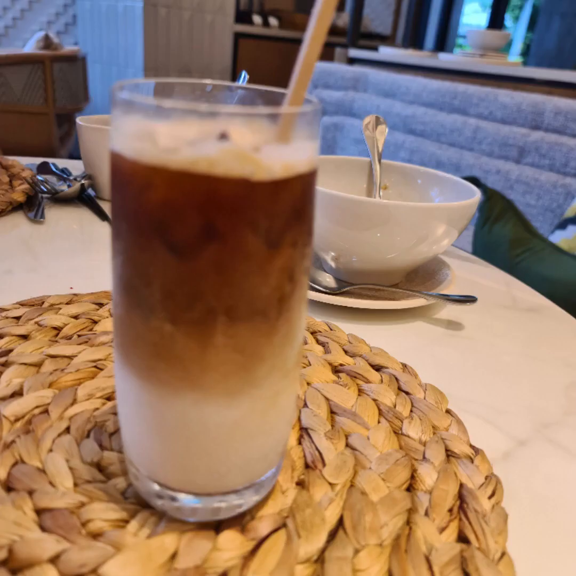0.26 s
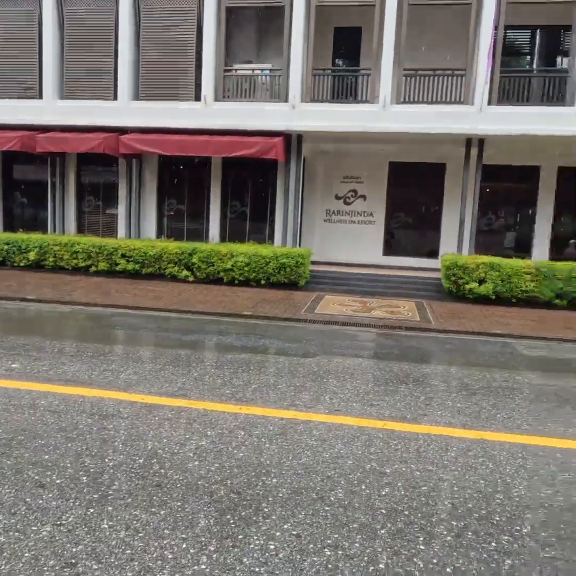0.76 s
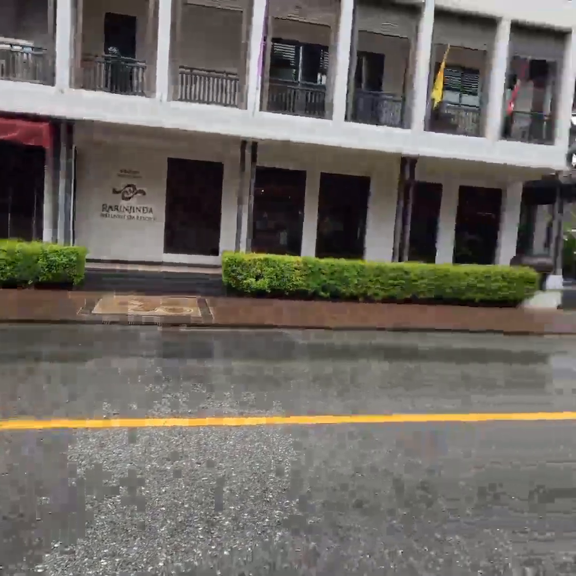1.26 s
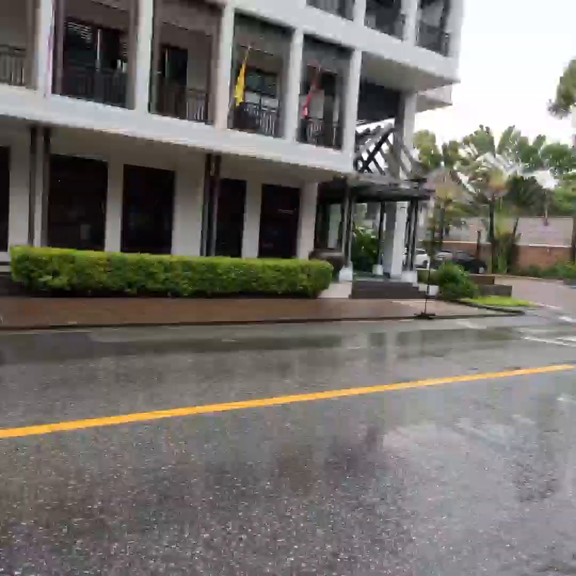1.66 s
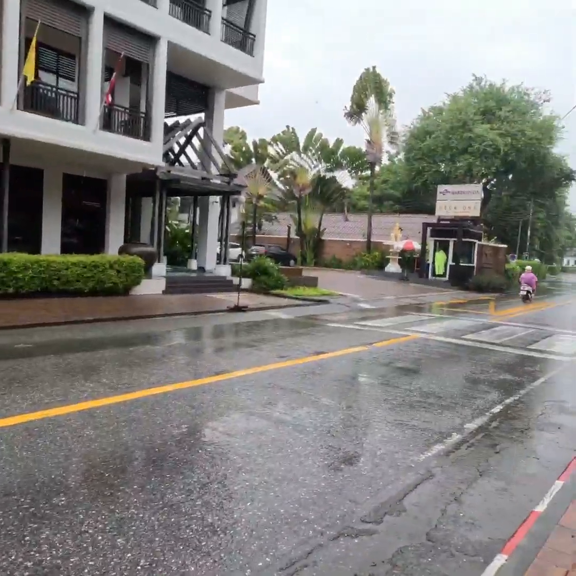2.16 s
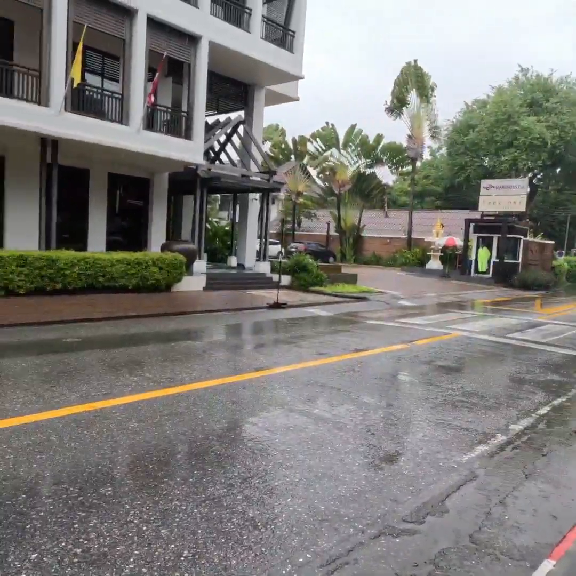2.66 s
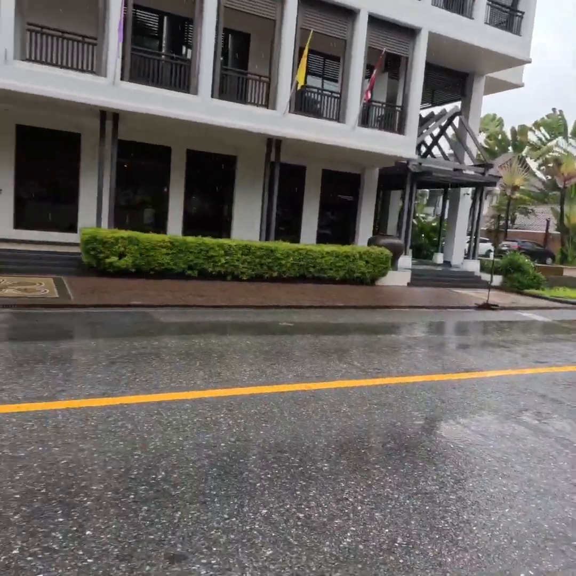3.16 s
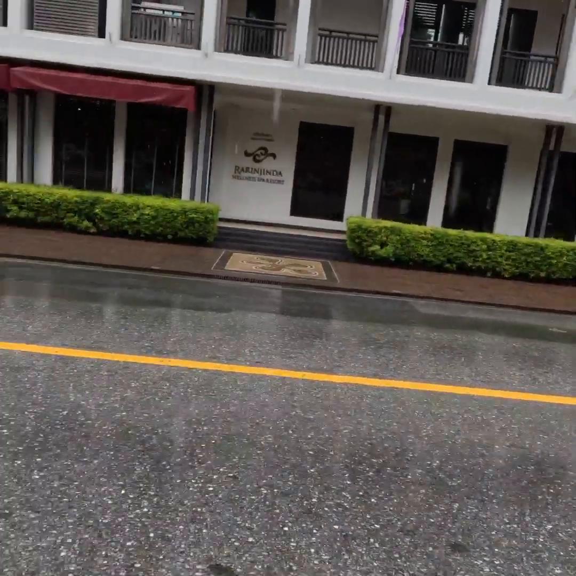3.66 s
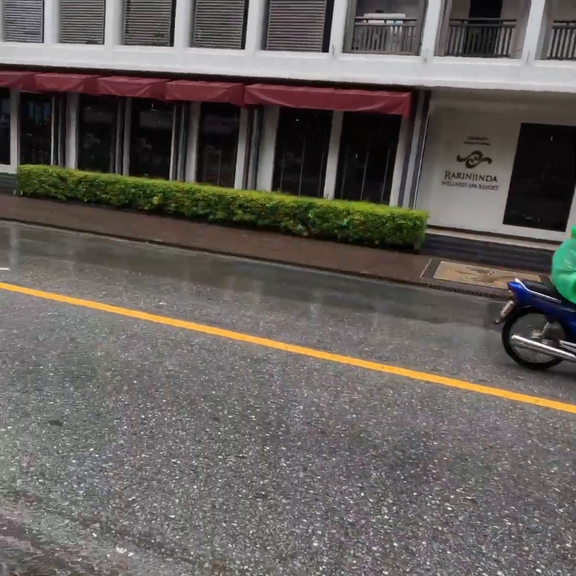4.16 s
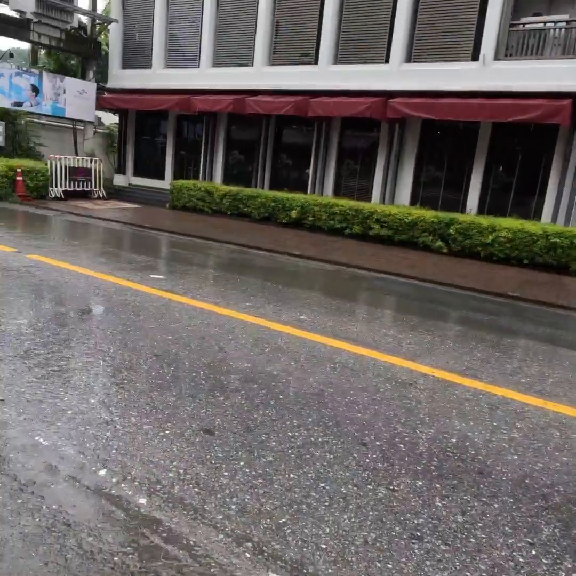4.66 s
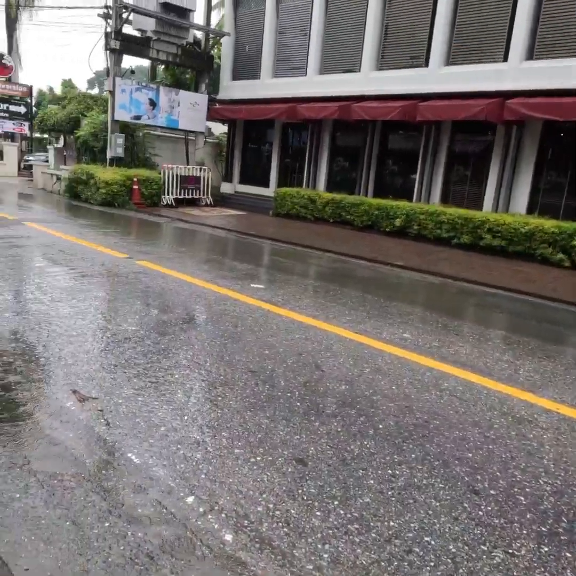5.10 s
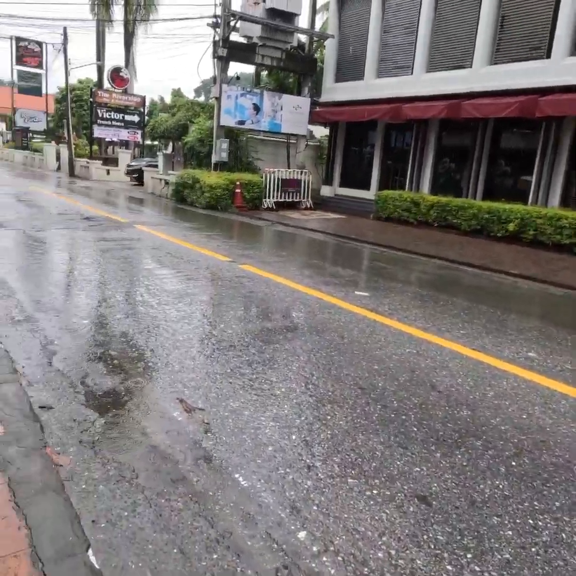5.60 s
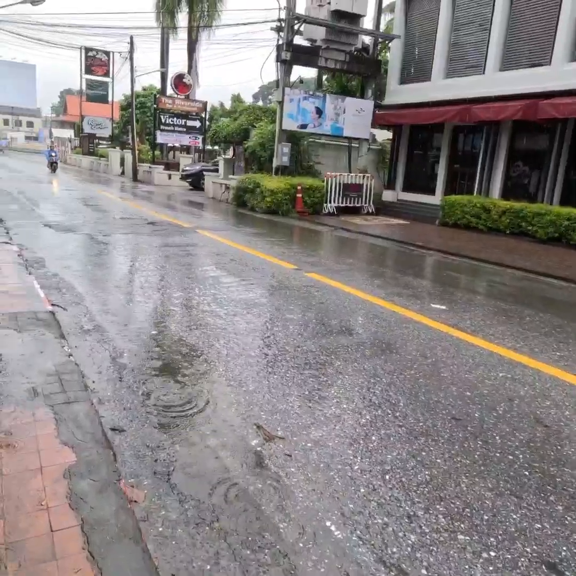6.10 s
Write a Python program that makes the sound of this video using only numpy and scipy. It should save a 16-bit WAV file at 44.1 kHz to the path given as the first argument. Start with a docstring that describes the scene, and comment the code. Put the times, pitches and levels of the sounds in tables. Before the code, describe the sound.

Heard from the kerb of a street in light rain, wet tyres hiss over a low traffic rumble, with single drops plinking into puddles and ticking on the pavement close by. The sound fades in on a motorbike moving away. A second, slower motorbike then putters past close to the microphone, its gears whining briefly and dipping in pitch. Near the end another engine hums in the distance.

```python
"""A motorbike rides away on a wet street in light rain, heard from the kerb, fading in after a silence.
A slower bike passes close with gear whine and tyre spray; a third engine drones far off.
Each exhaust is a stack of harmonics of its firing rate. Tyres, traffic rumble and fine rain are
shaped noise, the wet layers mixed with droplets. Near drops plink in puddles and tick on hard ground."""
import sys
import numpy as np
from scipy import signal
from scipy.fft import rfft, irfft
from scipy.io import wavfile
from scipy.ndimage import uniform_filter1d

SR = 44100
rng = np.random.default_rng(int(sys.argv[2]) if len(sys.argv) > 2 else 0)


def unload_wav(signal):
    """Save mono or channel-first audio to the path in sys.argv[1] as 16-bit WAV at rate SR, clipped to [-1, 1]."""
    wavfile.write(
        sys.argv[1],
        SR,
        np.round(np.clip(np.atleast_2d(signal).T, -1, 1) * 32767).astype(np.int16),
    )


N = 279594

# engine orders that boom between the house fronts
LEAVING_BOOM, PASSING_BOOM, DISTANT_BOOM = (4, 5, 7, 8), (6,), (2,)
# engine tracks: time_s, firing_hz, level_db, boom_db for each booming order, tilt_db_per_order
LEAVING_TRACK = [(0.66, 42.07, -29.5, -1, 4, 1, 2, -0.27), (0.84, 42.22, -28.5, 2, 1, -2.5, -5.5, -0.25),
                 (0.98, 42.09, -29.5, -2.5, 1, 3, 8, -0.13), (1.14, 42.28, -32, -8, 4, 4, 0.5, -0.19),
                 (1.27, 42.21, -30.5, -9, 1, 3, 4.5, -0.13), (1.4, 42.24, -32, -11, -9, 1, 1.5, -0.22),
                 (1.56, 42.07, -37, -8, -11, 0, 4.5, 0.086), (1.86, 42.1, -34.5, -2.5, -8, 2.5, 0, -0.57),
                 (2.14, 42.04, -39.5, 7, -4, 3, 1, -0.61), (2.3, 42.3, -37, 0.5, -1, -3, -7, -0.76),
                 (2.5, 41.9, -38, 1.5, -6, -1, 0, -0.95), (2.76, 41.9, -41.5, 3.5, 0, 0, -10, -0.71),
                 (3.4, 41.65, -42, 0.5, -6, 0, 5.5, -0.58), (4.2, 41.9, -42.5, -3, -3, 0, -1, -0.69)]
PASSING_TRACK = [(3.4, 25.96, -41.5, -6, 0.18), (3.84, 25.87, -35, -4, 0.26), (4.04, 25.5, -30, -4, -0.3),
                 (4.12, 25.5, -31.5, 3.5, -0.2), (4.2, 25.5, -32.5, 6, -0.11), (4.4, 25.4, -33, 9, -0.25),
                 (4.62, 25.4, -32.5, 7.5, -0.5), (4.7, 25.4, -31.5, -2, -0.3),
                 (4.8, 25.4, -32.5, -1.5, -0.22), (4.94, 25.41, -38.5, -2.5, -0.038),
                 (5.16, 25.56, -31.5, -4, -0.94), (5.6, 25.64, -39.5, 3.5, -0.1),
                 (6.34, 25.38, -36.5, -1, -0.6)]
DISTANT_TRACK = [(4.9, 64.56, -37, 0.12, 0.16), (5.6, 65.2, -35, 1.2, 0.092),
                 (6.34, 65.1, -34, -0.69, 0.09)]
# exhaust harmonics from order 1 up: gain_db
LEAVING_ORDERS_DB = [1.2, 1, -16, 4.5, -4, -7.5, -5, -4.5, -11, -10.5, -21.5, -19, -21.5, -19, -16, -23,
                     -24, -23, -19, -15, -16]
PASSING_ORDERS_DB = [-3, 3.5, -5, -6, -6.5, 1.5, -2, -8, -6.5, -9, -10.5, -10, -16, -15.5, -15.5, -12.5,
                     -17]
DISTANT_ORDERS_DB = [-1.5, -0.2, -14.5, -15.5, -14]
# gear whine of the passing bike: time_s, pitch_hz, level_db
WHINE_TRACK = [(4.0, 880, -57), (4.1, 860.5, -44.5), (4.2, 823, -41), (4.3, 823, -38.5), (4.45, 807, -42),
               (4.6, 812, -47), (4.7, 789, -56)]
# wet tyres: time_s, roar_db, spray_db
TYRE_TRACK = [(0.72, -33.5, -37.5), (1.09, -36, -42), (1.33, -36, -44), (1.6, -40, -39), (1.7, -40, -44),
              (2.02, -40, -45.5), (2.54, -42, -47.5), (3.06, -41.5, -48.5), (3.75, -37.5, -44),
              (3.94, -36, -40.5), (4.17, -36.5, -36.5), (4.35, -37, -38.5), (4.55, -37, -39),
              (4.66, -38.5, -41.5), (4.77, -40, -45.5), (5.41, -39.5, -49.5), (5.53, -39, -46.5),
              (5.6, -42, -44), (5.72, -39.5, -47), (5.96, -42, -50.5), (6.34, -41, -47)]
# drops in puddles: start_s, level_db, pitch_hz, splash_relative_db
PUDDLE_DROPS = [(1.057, -41.5, 6700, 0), (1.347, -26, 4400, -8), (2.031, -39.5, 3370, 1),
                (3.167, -37.5, 3826, -3.5), (3.556, -40, 4510, -3), (3.764, -37, 3075, -1),
                (3.839, -27.5, 3800, -7), (4.524, -26, 2856, -10), (4.861, -39, 4464, -2),
                (5.255, -37, 4200, -15), (5.258, -29, 1499, -10), (5.311, -45, 5145, -6),
                (5.569, -34.5, 1793, -1.5), (5.651, -36, 4250, -12.5)]
# drops on hard ground: start_s, level_db, body_relative_db
GROUND_DROPS = [(1.2396, -51, -6), (1.3104, -53, -6), (1.3668, -48, -6), (1.4162, -53, -6),
                (1.4716, -50, -6), (1.694, -51, -6), (1.7494, -48, -6), (1.7953, -46, -6),
                (1.8512, -42, -3), (2.0902, -54, -6), (3.041, -53, -6), (3.1044, -45, 0), (3.257, -54, -6),
                (3.3669, -53, -7), (3.3982, -49, -6), (3.499, -46, -6), (3.7592, -47, -9),
                (3.8402, -38, -9), (3.905, -46, -10), (4.0348, -48, -10), (4.1475, -52, -6),
                (4.3655, -40, -6), (4.4321, -42, -6), (4.7929, -42, 1), (4.8614, -47.5, -6),
                (4.9612, -50, -6), (5.0175, -52, -6), (5.1782, -46, -6), (5.2804, -53, -6),
                (5.3094, -40, -5), (5.4964, -56, -6), (5.5649, -51, -6), (5.5976, -54, -6),
                (5.6196, -47, -6), (5.6451, -50, -6), (5.7628, -51, -6), (5.7813, -53, -6),
                (5.887, -54, -6), (6.0437, -53, -2), (6.1145, -53, -6), (6.1345, -50.5, -4),
                (6.2542, -52, -8)]
# fine rain: time_s, level_db
RAIN_TRACK = [(0.8, -81), (1.22, -73), (1.45, -69), (1.86, -65.5), (2.26, -74), (2.88, -70.5),
              (3.75, -62.5), (4.41, -65), (4.6, -66), (5.35, -73), (5.68, -72), (6.34, -68)]
# noise spectra: frequency_hz, relative_density_db
ROAR_SPECTRUM = [(350, -20), (600, -9), (760, 0.5), (850, -0.5), (950, -2.5), (1300, -4), (1800, -10),
                 (2600, -20.5)]
SPRAY_SPECTRUM = [(1200, -7), (1700, -2.5), (2200, -3), (3000, -1.5), (3600, -4.5), (4500, -10),
                  (6500, -23.5)]
MIST_SPECTRUM = [(2800, -18), (4300, -2.5), (5500, -1), (7600, -3), (8500, -9), (10000, -14),
                 (11500, -23.5), (15000, -42)]
RUMBLE_SPECTRUM = [(8, -17), (18, 1), (30, -2), (60, -1.5), (110, -4), (200, -9.5), (330, -36)]
DRONE_SPECTRUM = [(90, -15), (180, -1.5), (300, 0), (420, -4.5), (480, -6), (650, -6.5), (900, -18.5)]
RAIN_SPECTRUM = [(9500, -9), (11200, -8), (12300, 2), (13500, -5), (15000, -7), (15900, -13)]
# fade-in: time_s, gain_db
FADE_IN = [(.605, -63), (0.614, -29), (0.631, -11.5), (0.659, -2.5), (.69, 0.5)]


def engine(track, orders_db, boom_orders, wander, rough_db, lag_rad):
    """Harmonics lined up as pulses; uneven firing bends the rate, street echoes make each order waver."""
    gate, (firing_hz, level_db, *boom_db, tilt_db) = curves(track)
    booms = dict(zip(boom_orders, boom_db))
    firing_rad = 2 * np.pi * np.cumsum(firing_hz * (1 + wander * walk(20))) / SR
    out = 0
    for order, gain_db in enumerate(orders_db, 1):
        order_db = level_db + gain_db + booms.get(order, 0) + tilt_db * (order - 1)
        # the pipe delays higher orders, spreading each pulse
        phase_rad = order * firing_rad - lag_rad * order ** 2 + 0.31 * np.sqrt(order) * walk(5)
        depth = 0.47 if order in boom_orders else min(order / 3.5, 1)  # booming and low orders are steadier
        waver_db = depth * (rough_db * walk(12) + 1.96 * walk(3.11))
        out -= undb(order_db + waver_db) * np.sqrt(2) * np.cos(phase_rad)
    return gate * out


def gear_whine():
    """A rough tone that drops as the bike passes, with a smeared second gear above it."""
    gate, (pitch_hz, level_db) = curves(WHINE_TRACK)
    phase_rad = 2 * np.pi * np.cumsum(pitch_hz * (1 + 0.01104 * walk(40))) / SR
    upper = undb(-4.5 + 2.5 * walk(29.95)) * np.sin(1.26 * phase_rad + 1.6 * walk(70))
    return gate * undb(level_db + 2 * walk(25.05)) * np.sqrt(2) * (np.sin(phase_rad) + upper)


def wet_tyres(gust):
    """Tyre roar, spray and a finer mist that follows both; wetter layers hold more droplets."""
    _, (roar_db, spray_db) = curves(TYRE_TRACK)
    mist_db = -50.5 + 0.43 * (roar_db + 40) + 0.64 * (spray_db + 40)
    roar = shaped_noise(ROAR_SPECTRUM, 2.03, 6, per_octave=6)
    spray = shaped_noise(SPRAY_SPECTRUM, 1.1, 14, per_octave=4, wet=0.23, drops_per_s=180)
    mist = shaped_noise(MIST_SPECTRUM, 1.5, 10, per_octave=3, wet=0.46, drops_per_s=240)
    return undb(roar_db) * roar + undb(spray_db + 0.5 * gust) * spray + undb(mist_db + 1.1 * gust) * mist


def puddle_plinks(samples=1500):
    """A trapped bubble rings for a few rising cycles inside a broad splash with a ragged tail."""
    out, t = np.zeros(N + samples), np.arange(samples) / SR
    attack = (1 - np.exp(-t / 0.0011)) ** 2
    splash_decay = np.exp(-t / 0.0034) + 0.24 * np.exp(-t / 0.015)
    for start_s, level_db, pitch_hz, splash_db in PUDDLE_DROPS:
        bubble = 5.5 * attack * np.exp(-t / 0.0011) * np.sin(2 * np.pi * pitch_hz * t * (0.94 + 22 * t))
        hiss = bandpass(rng.standard_normal(samples), 0.66 * pitch_hz, min(1.37 * pitch_hz, 15000), order=3)
        splash = 1.63 * attack * splash_decay * unit_rms(hiss)
        out[int(start_s * SR):][:samples] += undb(level_db) * (bubble + undb(splash_db) * splash)
    return out[:N]


def ground_ticks(samples=900):
    """Drops hit hard ground: millisecond noise bursts, each a bright splash and a duller body."""
    splash, body = np.zeros((2, N + samples))
    t = np.arange(samples) / SR
    attack = (1 - np.exp(-t / 0.00093)) ** 2
    decay = np.exp(-t / 0.0027) + 0.24 * np.exp(-t / 0.0076)
    for start_s, level_db, body_db in GROUND_DROPS:
        burst = undb(level_db) * attack * decay * rng.standard_normal(samples)
        splash[int(start_s * SR):][:samples] += burst
        body[int(start_s * SR):][:samples] += undb(body_db) * burst
    return (1.9 * bandpass(splash, 11800, 14000) + 2 * bandpass(body, 5000, 10500))[:N]


def traffic(floor_db=-36, bike_db=-31.5, recede_from_s=0.85, recede_db_per_s=13.5):
    """Low rumble and drone; both sink to a floor as the leaving bike recedes."""
    receding_s = np.maximum(np.arange(N) / SR - recede_from_s, 0)
    gain = np.hypot(undb(floor_db), undb(bike_db - recede_db_per_s * receding_s))
    rumble = undb(2.5) * shaped_noise(RUMBLE_SPECTRUM, 0.98, 5.55, per_octave=2)
    drone = shaped_noise(DRONE_SPECTRUM, 1.66, 3.95, per_octave=6)
    return gain * (rumble + drone)


def fine_rain(gust):
    """A faint high hiss, dense with tiny impacts."""
    _, (level_db,) = curves(RAIN_TRACK)
    hiss = shaped_noise(RAIN_SPECTRUM, 1.3, 12, per_octave=2, wet=0.73, drops_per_s=220)
    return undb(level_db + 0.9 * gust) * hiss


def shaped_noise(spectrum, flicker_db, flicker_hz, per_octave, wet=0, drops_per_s=100):
    """Unit-rms noise in bands; each flickers alone and, if wet, has its own droplets."""
    hz, db = np.transpose(spectrum)
    octave = np.log2(np.fft.rfftfreq(N, 1 / SR) + 1e-9)
    gain = undb(np.interp(octave, np.log2(hz), db, -120, -120))
    out = 0
    for centre in np.arange(np.floor(per_octave * np.log2(hz[0])), per_octave * np.log2(hz[-1]) + 1):
        band = np.cos(np.pi / 2 * np.clip(per_octave * octave - centre, -1, 1))
        source = rng.standard_normal(N) + wet * droplets(drops_per_s)
        out += undb(flicker_db * walk(flicker_hz)) * irfft(rfft(source) * gain * band, N)
    return unit_rms(out)


def droplets(per_s):
    """Impacts at random moments, a few much bigger than the rest."""
    out = np.zeros(N)
    moment, polarity, size = rng.random((1 + int(per_s * N / SR), 3)).T
    out[(moment * N).astype(int)] = np.sign(polarity - 0.5) * undb(14 * size ** 3)
    return unit_rms(out)


def curves(track, fade_s=0.44):
    """A gate that ramps outside the track's span, and its columns at every sample."""
    time_s, *columns = np.transpose(track)
    t = np.arange(N) / SR
    gate = np.clip(np.minimum(t - time_s[0], time_s[-1] - t) / fade_s + 1, 0, 1)
    return gate, [np.interp(t, time_s, column) for column in columns]


def walk(rate_hz):
    """Random steps smoothed twice; spread near 1."""
    hold = int(SR / rate_hz)
    steps = np.repeat(rng.standard_normal(N // hold + 1), hold)
    return 1.284 * uniform_filter1d(uniform_filter1d(steps, hold), hold)[:N]


def bandpass(x, low_hz, high_hz, order=2):
    return signal.sosfilt(signal.butter(order, [low_hz, high_hz], "band", fs=SR, output="sos"), x)


def undb(db):
    return 10 ** (np.asarray(db) / 20)


def unit_rms(x):
    return x / np.sqrt(np.mean(x ** 2))


def scene():
    """All sources, mono."""
    leaving = engine(LEAVING_TRACK, LEAVING_ORDERS_DB, LEAVING_BOOM,
                     wander=0.00405, rough_db=2.2, lag_rad=0.1494)
    passing = engine(PASSING_TRACK, PASSING_ORDERS_DB, PASSING_BOOM,
                     wander=0.003, rough_db=1.7, lag_rad=0.1183) + gear_whine()
    distant = engine(DISTANT_TRACK, DISTANT_ORDERS_DB, DISTANT_BOOM,
                     wander=0.00307, rough_db=2.4, lag_rad=0.21)
    gust = walk(10)  # shared by spray, mist and rain
    street = traffic() + wet_tyres(gust) + fine_rain(gust)
    return (leaving + passing + distant + street + puddle_plinks() + ground_ticks())[None]


def record(dry):
    """Fade-in from silence, then a steep low-pass."""
    time_s, gain_db = np.transpose(FADE_IN)
    fade = undb(np.interp(np.arange(N) / SR, time_s, gain_db, left=-200))
    top_hz = 15750
    return signal.sosfilt(signal.ellip(10, 0.2, 80, top_hz, fs=SR, output="sos"), dry * fade)


dry = scene()
out = record(dry)
unload_wav(out)
```